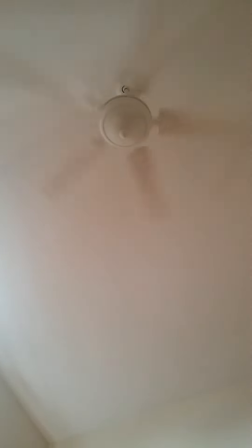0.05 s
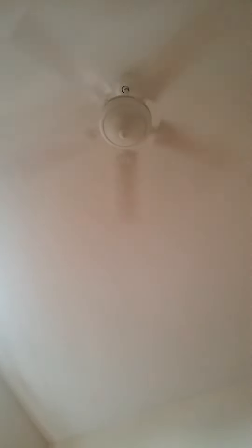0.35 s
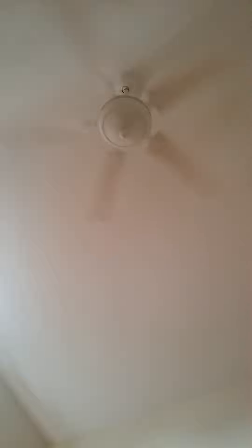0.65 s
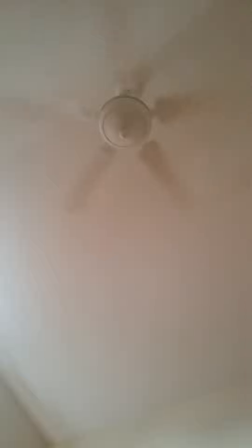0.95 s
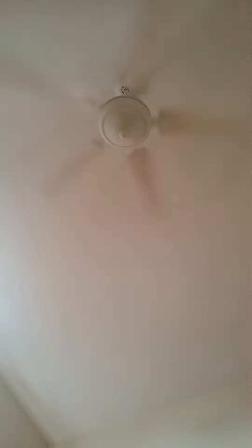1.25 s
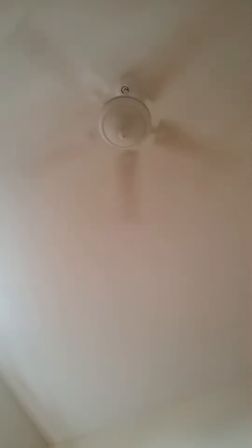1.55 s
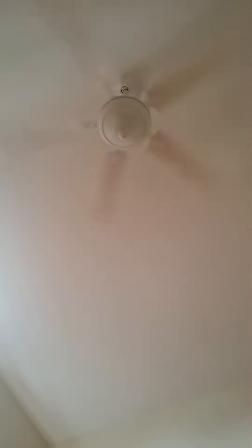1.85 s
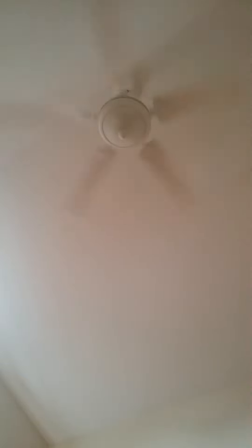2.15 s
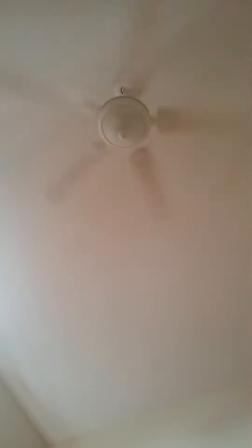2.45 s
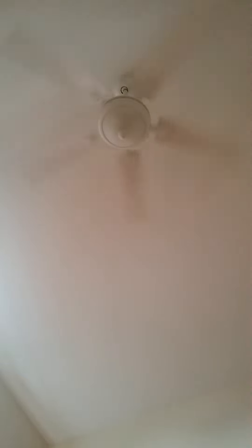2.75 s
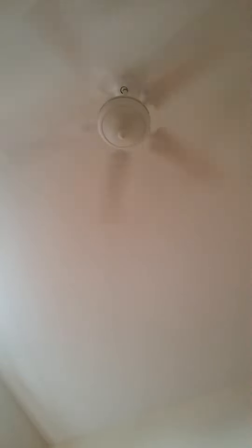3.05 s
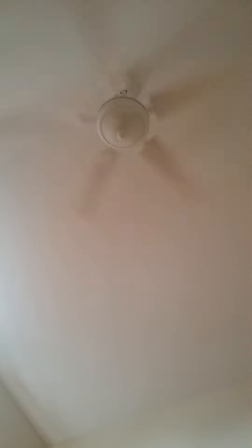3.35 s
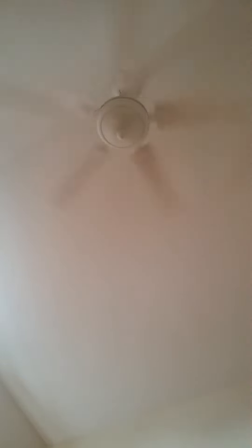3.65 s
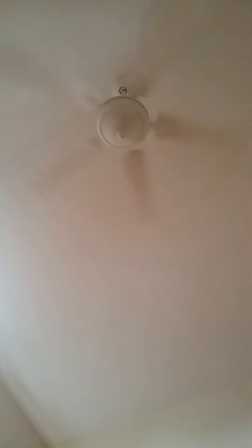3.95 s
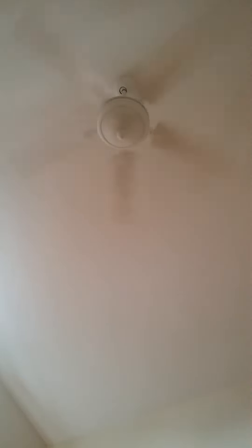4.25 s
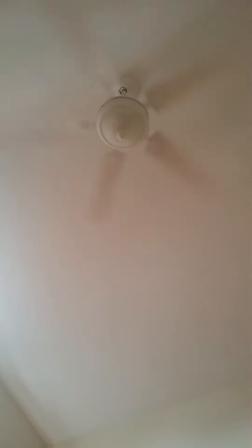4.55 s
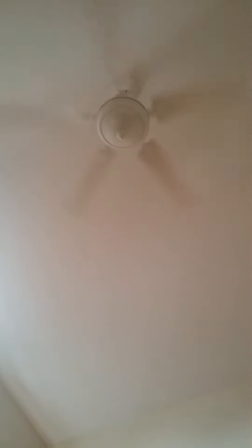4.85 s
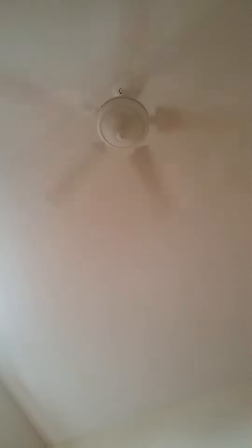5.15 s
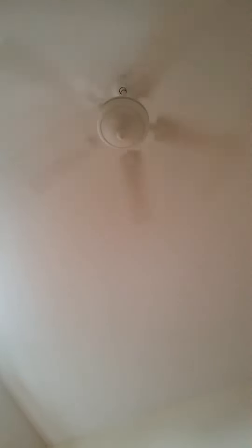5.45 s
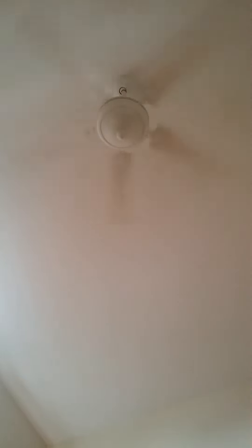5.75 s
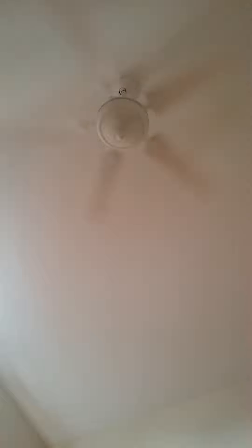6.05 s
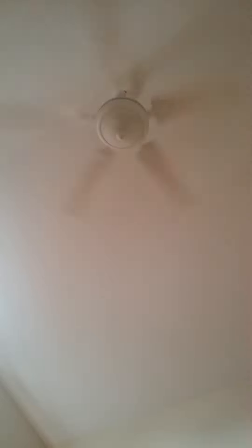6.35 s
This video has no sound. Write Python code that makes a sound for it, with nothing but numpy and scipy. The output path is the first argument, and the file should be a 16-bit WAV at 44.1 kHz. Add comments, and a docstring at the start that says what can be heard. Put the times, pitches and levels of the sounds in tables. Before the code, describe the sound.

A ceiling fan hums low and steady in a small room, with light ticks, one sharp knock and a few electrical pops.

```python
"""A slow ceiling fan

A ceiling fan turns slowly in a small room, close to a phone microphone. Its motor hums: the spinning
rotor makes tones, and the magnetic pull of the mains adds more beside them, over a soft rush of air.
A few light ticks and one snapping knock sound nearby. Sharp electrical pops jump in the microphone line."""
import sys
import numpy as np
from scipy import signal
from scipy.fft import rfft, irfft, next_fast_len
from scipy.io import wavfile
from scipy.ndimage import map_coordinates

SR = 44100
rng = np.random.default_rng(int(sys.argv[2]) if len(sys.argv) > 2 else 0)


def unload_audio(sound):
    """Save the sound as a 16-bit wav file, at the path given as the first command line argument."""
    columns = np.transpose(np.atleast_2d(sound))
    # keep every value between -1 and 1, then stretch to whole-number steps
    steps = np.round(np.clip(columns, -1, 1) * 32767)
    wavfile.write(sys.argv[1], SR, steps.astype(np.int16))


N = 286209
T = np.arange(N) / SR
ROTOR_HZ, PULL_HZ = 49.065, 120.03  # how fast the rotor ripples and the mains pulls

# The room's echo. Each row: frequency in Hz, seconds to fade by 60 dB.
ROOM_FADE = [(150, 0.17), (2000, 0.13), (9000, 0.1)]
# Light ticks. Each row: start in seconds, level in dB, pitch in Hz.
LIGHT_TICKS = [(3.0623, -32, 1030), (3.269, -41, 1200), (3.3246, -32, 3400), (3.454, -42, 3180),
               (3.666, -42, 3500), (3.673, -38, 1700), (6.366, -42.5, 3600)]
# A knock and its rebound. Each row: start in seconds, strength in dB, contact time in seconds.
KNOCK_HITS = [(3.2985, -8.7, 0.000099), (3.3236, -20, 0.0014)]
# The knocked casing's tones. Each row: pitch in Hz, relative level in dB, seconds to fade by 60 dB.
CASING_TONES = [(192, -6, 0.026), (407, -3.5, 0.019), (690, -10, 0.012), (1050, -12.5, 0.013),
                (1920, -4, 0.0037), (3020, -2, 0.0028), (4030, -3.5, 0.0022)]
# Electrical pops. Each row: start in seconds, size of the jump in dB.
VOLTAGE_JUMPS = [(3.15259, -9.5), (6.03458, -7.4), (6.17955, -10.9), (6.2194, -42), (6.29853, -7.9),
                 (6.30138, -7.5), (6.31506, -5.2)]
# The rush of air. Each row: frequency in Hz, level in dB per Hz.
AIR_SPECTRUM = [(10, -102), (25, -100), (60, -100), (85, -86), (140, -76.5), (175, -82.5), (220, -80.5),
                (300, -88.5), (480, -93.5), (780, -98), (1100, -99), (2700, -103), (4400, -104),
                (9000, -122)]
# How the bearing's rub rises and falls. Each row: time in seconds, relative level in dB.
RUB_LEVELS = [(0.0, -62.5), (2.08, -63.5), (3.36, -61.5), (5.51, -62.5), (6.2, -61), (6.49, -59.5)]
# Where the motor housing rings. Each row: centre in Hz, width in Hz, gain in dB.
HOUSING_RESONANCES = [(459, 185, -90), (592, 68, -90), (1396, 380, -95), (1900, 107, -96),
                      (2087, 304, -93.5), (3300, 164, -93.5), (3536, 145, -96)]
# The hum's clearest tones. Each row: multiple of ROTOR_HZ, added multiple of PULL_HZ, level in dB.
STRONG_TONES = [(0, 1, -64), (0, 2, -57.3), (2, 0, -59.8), (3, 0, -47.4), (4, 0, -68.6), (5, 0, -65),
                (6, 0, -66), (6, 1, -63.6), (8, 0, -70.5), (10, 1, -70.8), (18, 0, -77.5), (23, 1, -78.5),
                (26, 2, -77)]
# The microphone's tone colour. Each row: frequency in Hz, gain in dB.
MIC_RESPONSE = [(1500, 0), (2700, -1.38), (3600, -2), (4500, -4.5), (7200, -11), (8800, -9.5),
                (10800, -4.5), (12000, -5.5), (15000, -4.5)]


def amp(db):
    """Turn decibels into a gain."""
    return 10 ** (np.asarray(db) / 20)


def along(points, hz):
    """Read between rows of (Hz, value) on a logarithmic frequency scale."""
    freqs, values = np.transpose(points)
    return np.interp(np.log(hz + 1), np.log(freqs), values)


def wobble(rate):
    """A smooth curve through `rate` random values a second."""
    return map_coordinates(rng.standard_normal(int(N * rate / SR) + 4), [T * rate + 1])


def filtered(x, response):
    """Scale each frequency in x by the gain response(hz)."""
    size = next_fast_len(N + SR // 2)
    return irfft(rfft(x, size) * response(np.fft.rfftfreq(size, 1 / SR)), size)[:N]


def hiss():
    """White noise with a power of one per Hz."""
    return rng.standard_normal(N) * np.sqrt(SR / 2)


def room_echo(x):
    """The walls answer with a short echo whose treble dies first."""
    hz, t, noise = signal.stft(rng.standard_normal(SR // 2), SR, nperseg=256)
    fade = amp(-60 * t / along(ROOM_FADE, hz)[:, None])
    tail = signal.istft(noise * fade, SR, nperseg=256)[1]
    return signal.fftconvolve(x, tail / np.linalg.norm(tail))[:N]


def ticks(fade_cycles=11, grit=0.45, room_db=-7):
    """Each small contact rings briefly with a little grit; lower ones last longer."""
    out, t = np.zeros(N + SR), np.arange(SR // 10) / SR
    for start, db, hz in LIGHT_TICKS:
        lowpass = signal.butter(4, min(1.25 * hz, SR / 3), fs=SR)
        scrape = signal.lfilter(*lowpass, rng.standard_normal(len(t)))
        fade = amp(db - 60 * hz * t / fade_cycles)
        tick = np.sin(2 * np.pi * hz * t) + grit * scrape / scrape.std()
        out[round(start * SR):][:len(t)] += fade * tick
    return out[:N] + amp(room_db) * room_echo(out[:N])


def knock(room_db=-20, bass_cut_hz=45, crack_db=-16, crack_fade_s=0.0075):
    """A bump makes a casing crack and ring briefly; the rebound touches longer, so it sounds duller."""
    out, t = np.zeros(N + SR), np.arange(SR // 10) / SR
    ring = sum((-1) ** k * amp(db - 60 * t / fade_s) * np.sin(2 * np.pi * hz * t)
               for k, (hz, db, fade_s) in enumerate(CASING_TONES))
    crack = amp(crack_db - 60 * t / crack_fade_s) * rng.standard_normal(len(t))
    # a small casing gives off little bass
    blow = signal.lfilter(*signal.butter(1, bass_cut_hz, 'high', fs=SR), ring + crack)
    for start, db, contact_s in KNOCK_HITS:
        push = np.sin(np.pi * np.minimum(t / contact_s, 1))
        hit = signal.fftconvolve(blow, push / push.sum())[:len(t)]
        out[round(start * SR):][:len(t)] += amp(db) * hit
    return out[:N] + amp(room_db) * room_echo(out[:N])


def pops(bass_cut_hz=104, damping=0.58):
    """The voltage jumps; the input's bass filter pulls it back, swinging past zero. There is no echo."""
    jumps, t = np.zeros(N), np.arange(SR // 20) / SR
    for start, db in VOLTAGE_JUMPS:
        jumps[round(start * SR)] += amp(db)
    angle = np.arccos(damping)
    phase = 2 * np.pi * bass_cut_hz * t
    swing = np.sin(angle - np.sin(angle) * phase) / np.sin(angle)
    return signal.fftconvolve(jumps, np.exp(-damping * phase) * swing)[:N]


def air(swell_db=1.4, boom_hz=72, boom_half_width_hz=2, boom_db=-77):
    """The blades push a soft, uneven rush of air, which booms faintly at a low note of the room."""
    boom = lambda hz: amp(boom_db) / (1 + ((hz - boom_hz) / boom_half_width_hz) ** 2)
    rush = filtered(hiss(), lambda hz: amp(along(AIR_SPECTRUM, hz)) + boom(hz))
    return rush * amp(swell_db * wobble(6))


def whirr(harmonics=54, spread_db=5):
    """The motor's many faint tones blend into a whirr with a power of about one per Hz."""
    out, position = np.zeros(N), np.linspace(0, 1, 4096)
    multiples = np.arange(1, harmonics + 1)[:, None]
    for pull in range(3):
        levels = amp(spread_db * rng.standard_normal(multiples.shape))
        phases = 2 * np.pi * (multiples * position + rng.random(multiples.shape))
        one_cycle = np.sum(levels * np.exp(1j * phases), axis=0)
        rotor_tones = np.interp(ROTOR_HZ * T % 1, position, one_cycle)
        out += np.real(rotor_tones * np.exp(2j * np.pi * pull * PULL_HZ * T))  # shift up by the pull
    return out / out.std() * np.sqrt(harmonics * ROTOR_HZ)


def bearing(flutter_db=1.0, rub_db=-2, whirr_db=-4, rub_depth=1.5):
    """The bearing's rub and the motor's whirr sound through the ringing housing."""
    times, levels = np.transpose(RUB_LEVELS)
    drift_db = rub_depth * np.interp(T, times, levels - np.median(levels))
    pressure = amp(drift_db + flutter_db * wobble(28))
    shaking = pressure * (amp(rub_db) * hiss() + amp(whirr_db) * whirr())
    housing = lambda hz: sum(amp(db) / (1 + (2 * (hz - centre) / width) ** 2)
                             for centre, width, db in HOUSING_RESONANCES)
    return filtered(shaking, housing)


def tone_db(ripple, pull, faint_db=-73.5, corner_hz=487, db_per_octave=15.5, db_per_pull=2):
    """A hum tone's level: listed if strong, else weaker with higher pitch and each step of mains pull."""
    strong = {(r, p): db for r, p, db in STRONG_TONES}
    octaves = np.log2(max((ripple * ROTOR_HZ + pull * PULL_HZ) / corner_hz, 1))
    return strong.get((ripple, pull), faint_db - db_per_octave * octaves - db_per_pull * abs(pull))


def motor_hum(waver_db=2.0, waver_radians=0.19, loudest_waver_db=0.6):
    """The rotor's ripple and the mains pull mix, making tones at their sums and differences."""
    loudest = max(db for _, _, db in STRONG_TONES)
    out = np.zeros(N)
    for pull in (-1, 0, 1, 2):
        # the passing blades stir the sound's paths; the loudest tone wavers only a little
        stir = amp(waver_db * wobble(5)) * np.exp(1j * waver_radians * wobble(5))
        for ripple in range(28):
            hz, db = ripple * ROTOR_HZ + pull * PULL_HZ, tone_db(ripple, pull)
            if hz >= (PULL_HZ if pull else ROTOR_HZ):
                waver = amp(loudest_waver_db * wobble(5.2)) if db == loudest else stir
                tone = np.exp(2j * np.pi * (hz * T + rng.random()))
                out += amp(db) * np.real(waver * tone)
    return np.sqrt(2) * out


def scene(hiss_db=-104.5):
    """The fan, small contacts in the room, and the microphone's own hiss and pops."""
    fan = motor_hum() + air() + bearing()
    return (fan + ticks() + knock() + amp(hiss_db) * hiss() + pops())[None]


def record(dry, top_hz=15550):
    """The microphone softens the treble and keeps nothing above top_hz."""
    return filtered(dry[0], lambda hz: amp(along(MIC_RESPONSE, hz)) * (hz < top_hz))[None]


dry = scene()
out = record(dry)
unload_audio(out)
```